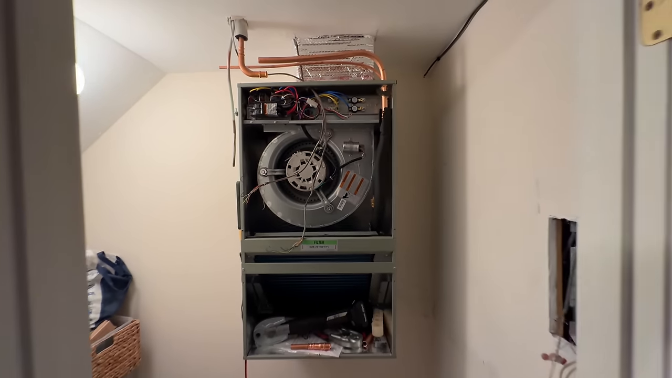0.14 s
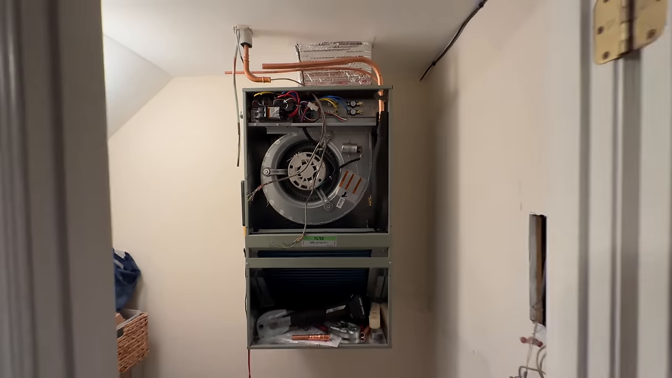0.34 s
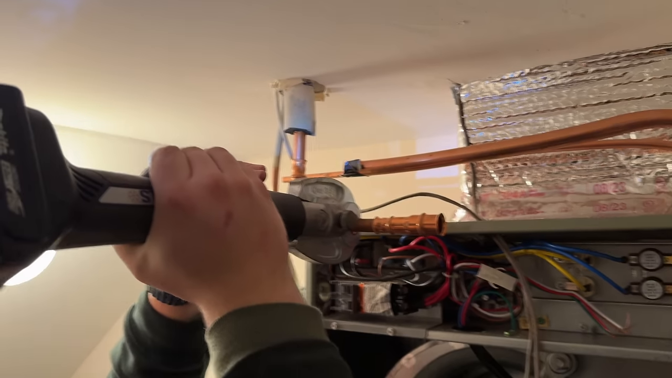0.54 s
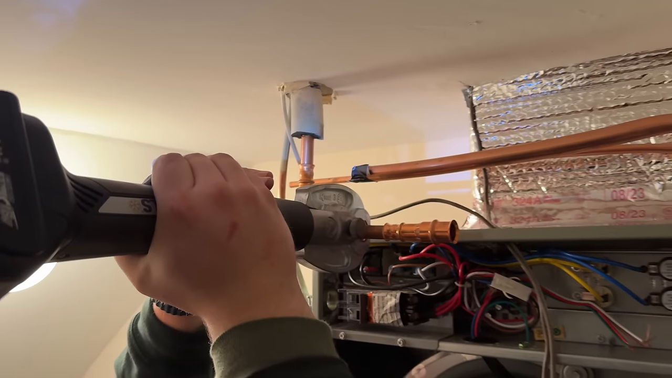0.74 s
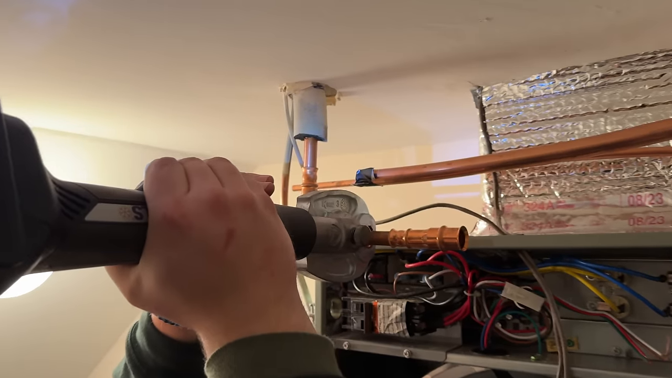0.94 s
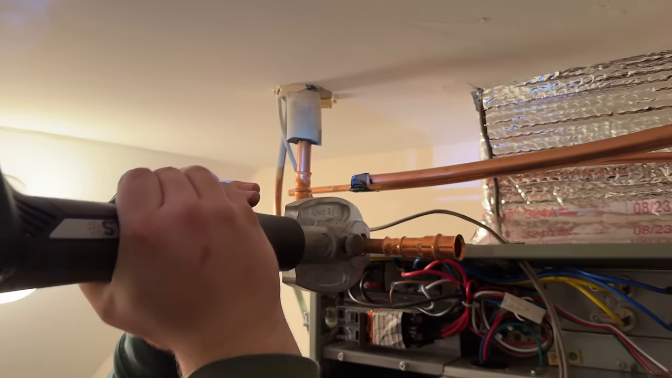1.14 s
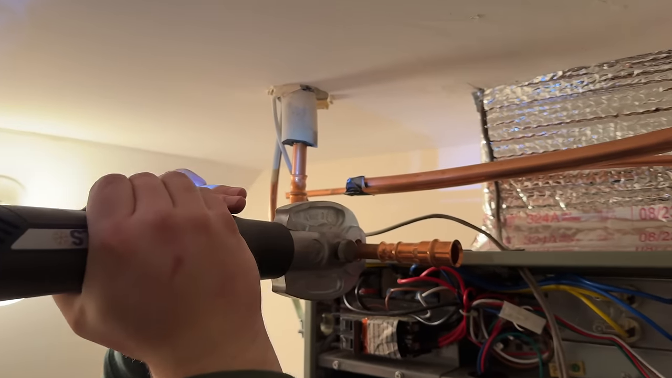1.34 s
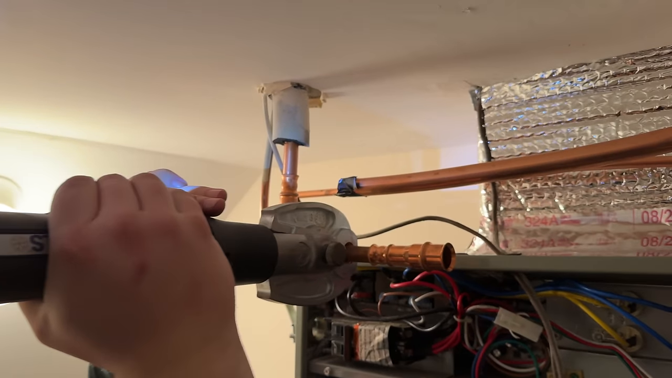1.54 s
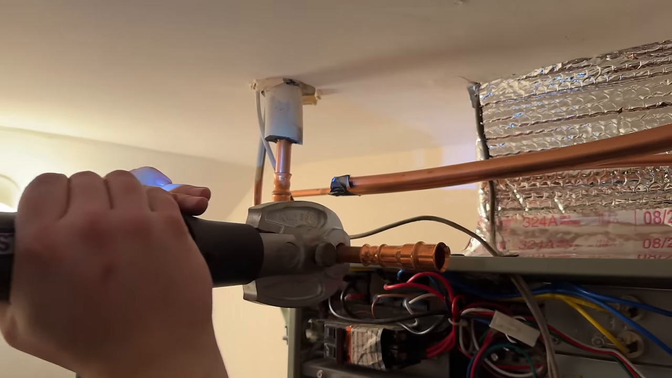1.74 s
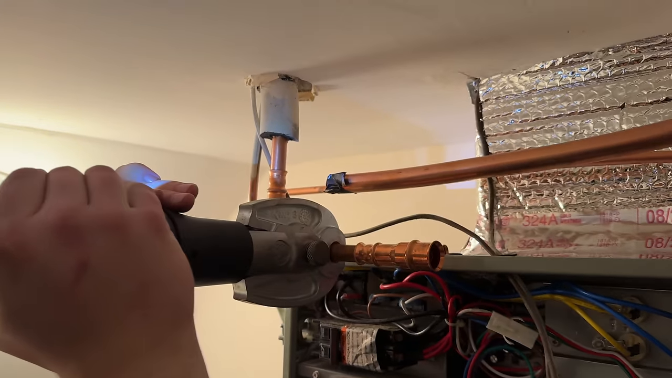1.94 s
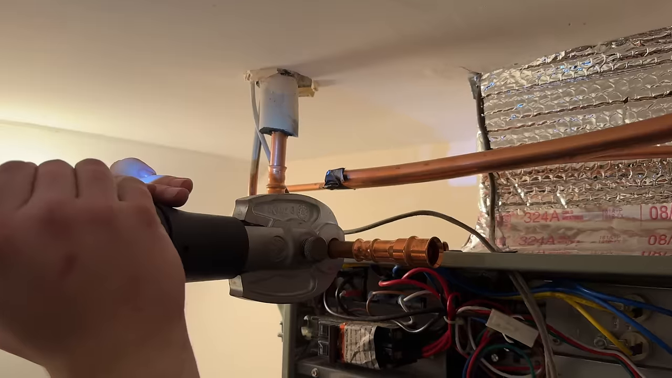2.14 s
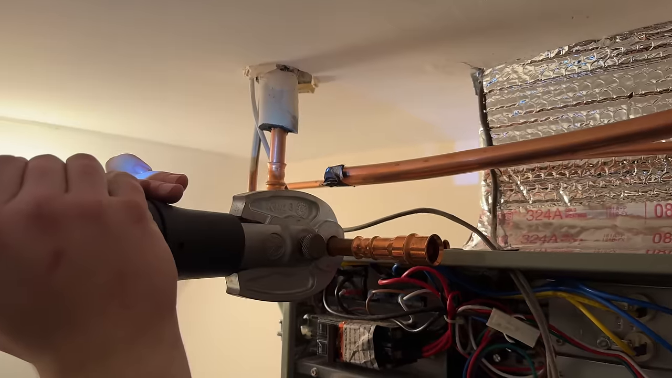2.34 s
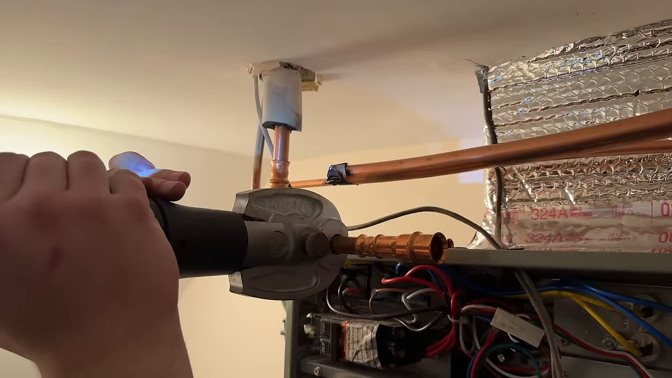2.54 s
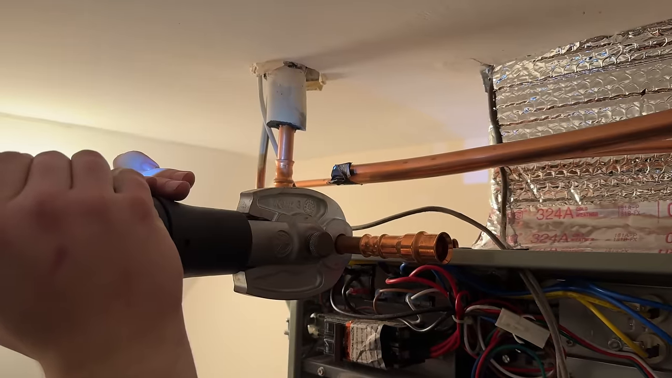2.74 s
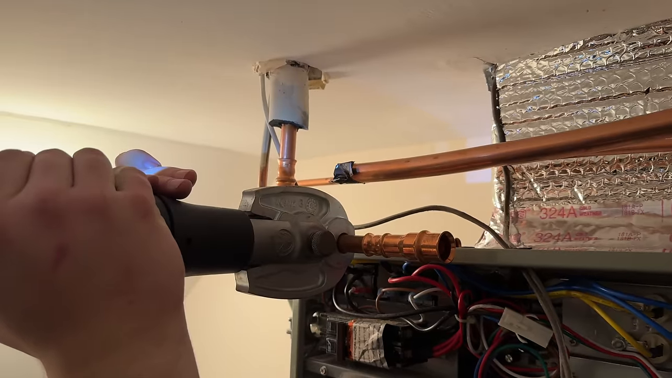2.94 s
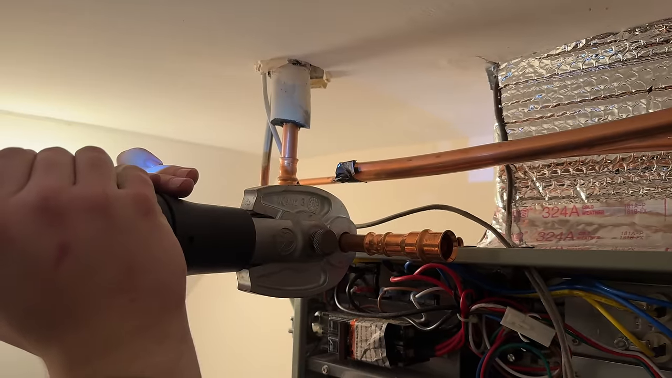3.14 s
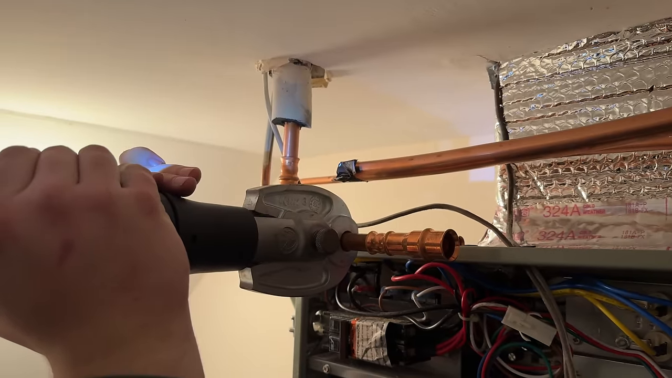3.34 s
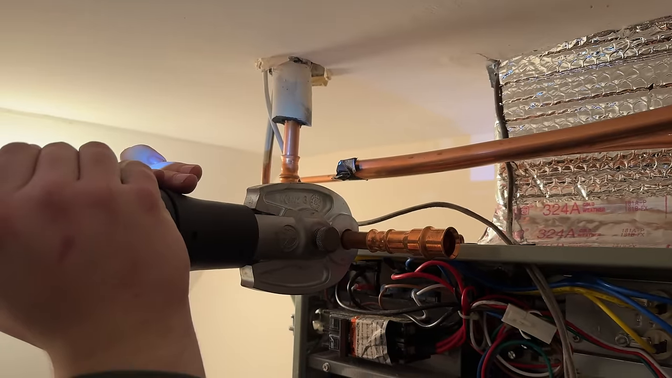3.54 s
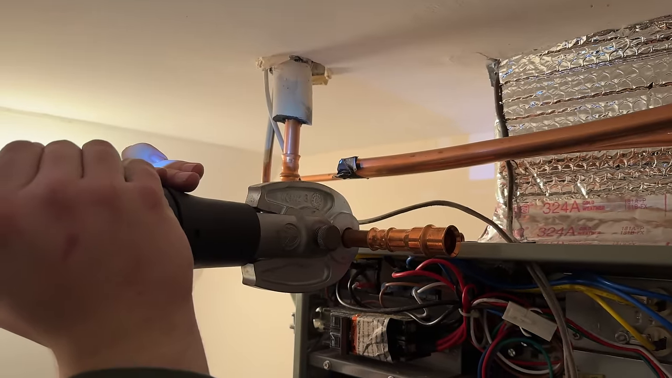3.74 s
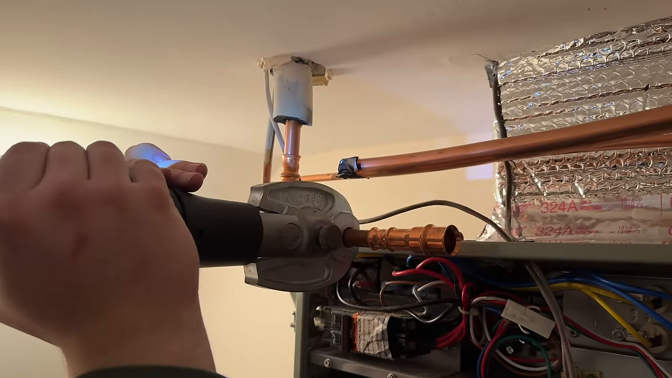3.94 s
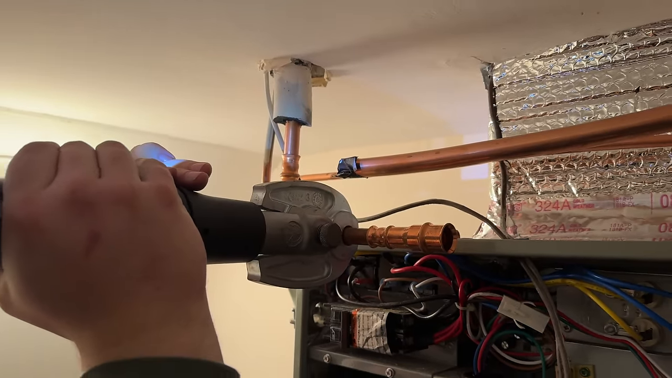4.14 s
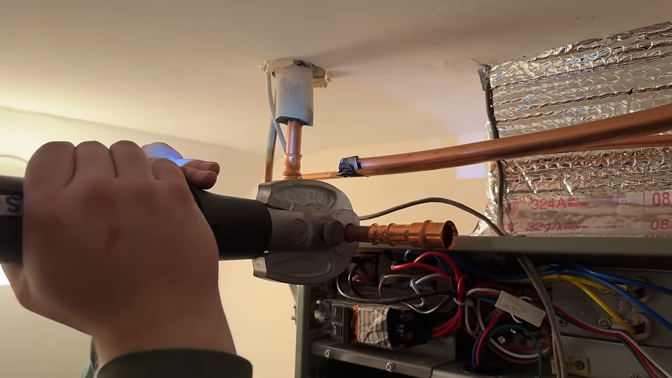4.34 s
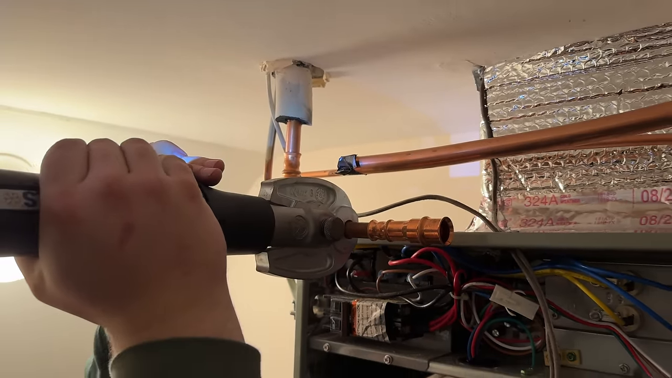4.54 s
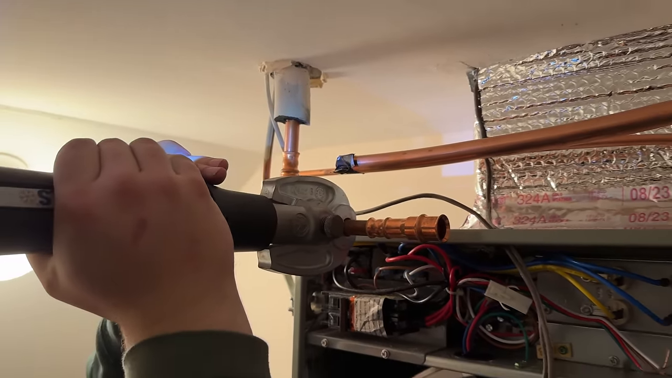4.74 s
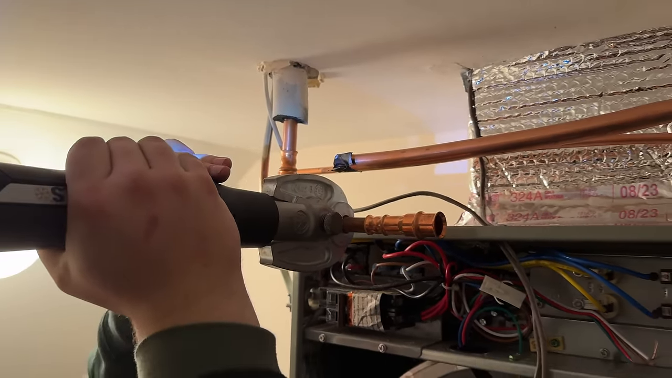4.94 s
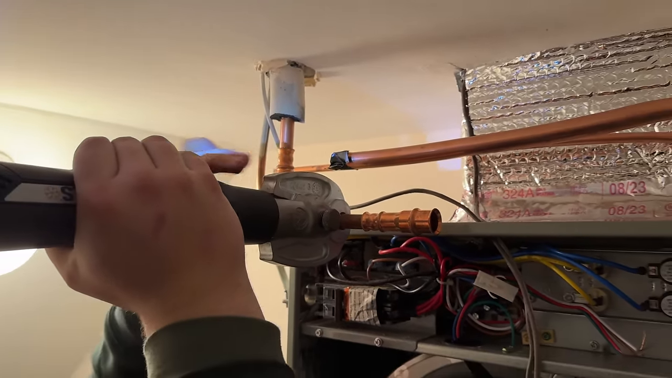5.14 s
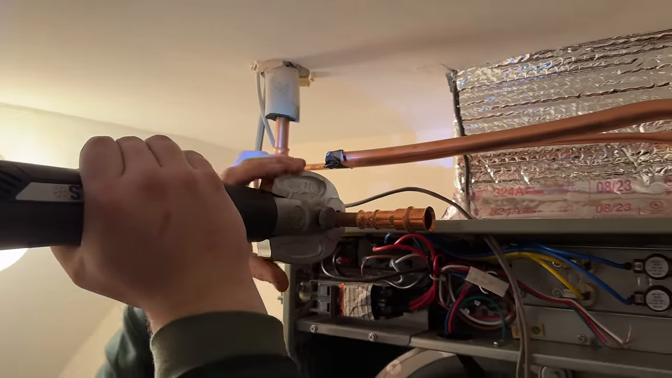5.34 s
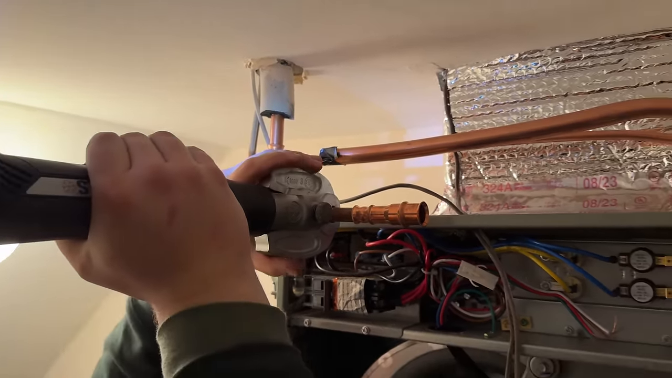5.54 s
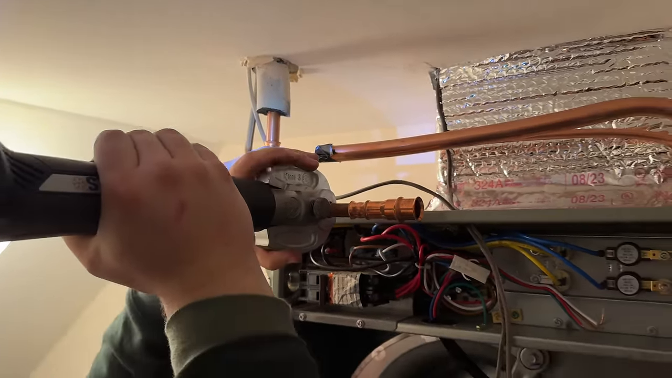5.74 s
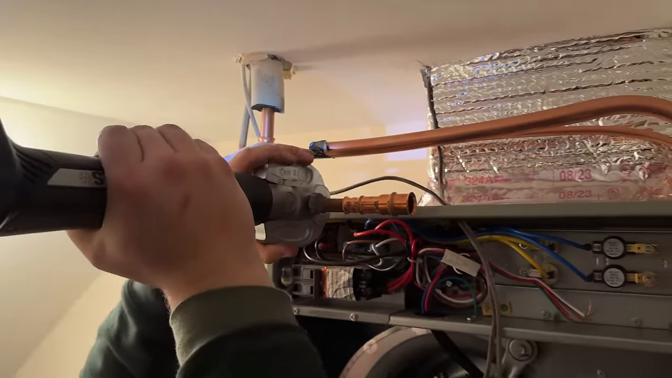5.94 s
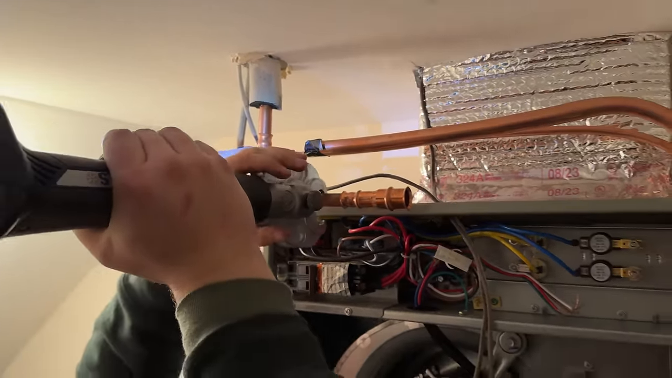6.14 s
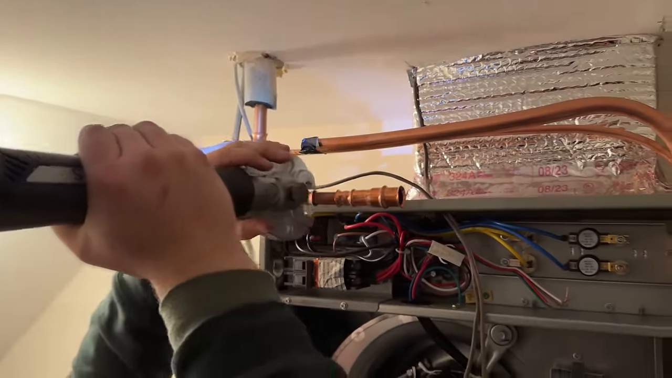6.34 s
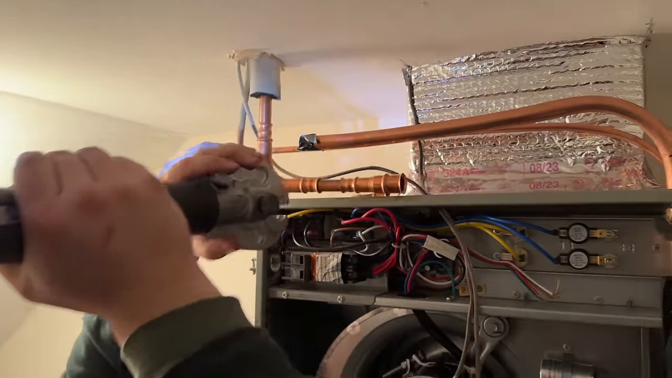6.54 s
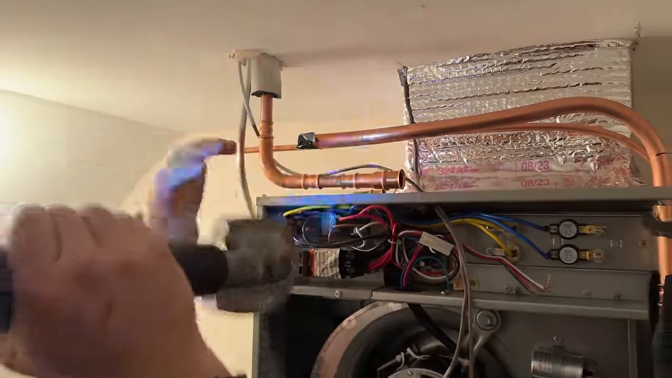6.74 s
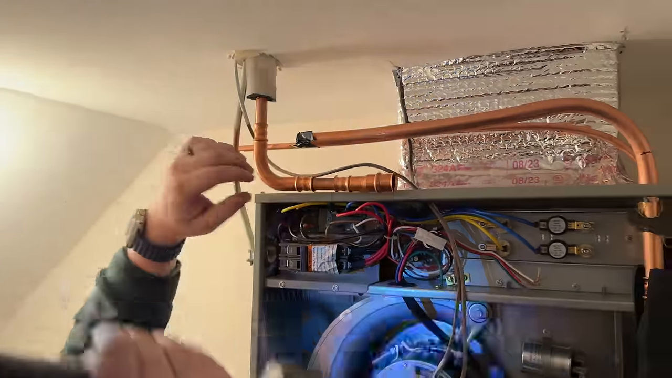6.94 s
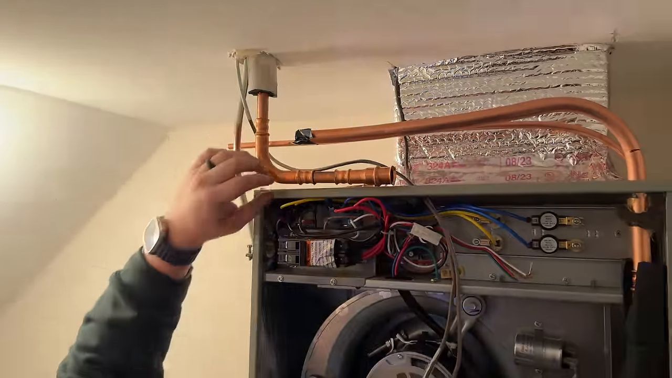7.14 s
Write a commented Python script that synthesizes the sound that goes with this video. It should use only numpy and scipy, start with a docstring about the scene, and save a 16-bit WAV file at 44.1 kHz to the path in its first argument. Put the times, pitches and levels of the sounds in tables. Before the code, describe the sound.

A handheld crimper starts abruptly after light contact clicks, its pump rattling fast with gear whine and a low hum. The tone sags as pressure builds for nearly three seconds, then races for an instant with a valve spit and stops dead. Low room rumble remains, with small clicks and dull taps. Jaws are then worked loose with clacks, cloth rustle and one loud steel snap, heard close in a short-reverb room.

```python
"""A battery press tool crimps a copper fitting in a small utility room: clacks of contact, then the motor starts.
A piston pump strokes twice a turn (shaft harmonics, gear tones, noise bursts) and slows under load; copper rasps.
The relief valve spits (a decaying noise burst) and the motor stops. Hands then shift the tool with soft knocks and
slides of shaped noise, and steel jaws clack open and snap shut as noise bursts through resonances.
Filtered noise gives a low rumble and a faint hiss throughout."""
import sys
import numpy as np
from scipy import signal
from scipy.fft import rfft, irfft, next_fast_len
from scipy.io import wavfile
from scipy.ndimage import uniform_filter1d

SR = 44100
rng = np.random.default_rng(int(sys.argv[2]) if len(sys.argv) > 2 else 0)


def to_wav(s):
    """Save 16-bit WAV."""
    ch = np.atleast_2d(s).T  # columns
    pcm = np.round(np.clip(ch, -1, 1) * 32767)  # PCM
    wavfile.write(sys.argv[1], SR, pcm.astype(np.int16))


N = 317079
TIME = np.arange(N) / SR   # s
SIZE = 2 * next_fast_len(N // 2 + SR // 2)   # transform length, with space for the room's tail
HZ = np.maximum(np.arange(SIZE // 2 + 1) * SR / SIZE, 1)

# shaft speeds at full pressure, squeezing and running free [turns per s]
STAGE_SPEEDS = [44.5, 58.5, 66]
# broad colour of the tool housing: f/Hz, relative level/dB per Hz
HOUSING = [(90, -7), (220, -7.5), (450, -3), (850, 6.5), (1130, -8), (1500, -4), (3100, -5), (4600, -11.5),
           (7000, -16), (11500, -15), (12700, -24), (14000, -14), (15800, -31.5)]
GEARING = 5.63   # motor turns per pump turn
MOTOR_ON, VALVE_OPENS, MOTOR_OFF = .475, 3.27, 3.39   # s
BITE_STARTS, BITE_PEAKS = 0.92, 1.51   # the jaws bite into the copper, s
BLEED_S = .05   # the pressure drains


def from_db(db):
    """Level in decibels to amplitude ratio."""
    return 10 ** (np.asarray(db) / 20)


def rms_one(x):
    """Normalise the effective (rms) amplitude to 1."""
    return x / np.sqrt(np.mean(x ** 2) + 1e-20)


def at_hz(points, hz=HZ):
    """Interpolate a spectrum linearly along a logarithmic frequency axis."""
    f, values = np.array(points)[:, 0], np.array(points)[:, 1]
    return np.interp(np.log(hz), np.log(f), values)


def response(db):
    """Minimum phase: folding the cepstrum makes a causal response with the given gains."""
    cepstrum = irfft(np.log(from_db(db)))
    half = len(cepstrum) // 2
    cepstrum[1:half] *= 2
    cepstrum[half + 1:] = 0
    return np.exp(rfft(cepstrum))


def filtered(x, gain):
    """Linear filtering: multiply the spectrum by a frequency response."""
    return irfft(rfft(x, SIZE) * gain)[..., :N]


def spread(pair, gain, direct=.8, wide_db=0):
    """Stereo coherence: direct sound leads in phase on the left; uncorrelated sound is diffuse."""
    # share of direct sound: f/Hz, factor
    direct_factor = [(2000, 0.95), (4000, 0.88), (8000, 0.96)]
    # stereo width: f/Hz, side minus mid level/dB, before wide_db
    side_level = [(60, -15), (220, -11.5), (330, -2.5), (750, -4.5), (1170, 5.5), (1800, 0), (6400, -3),
                  (9800, 2.5), (14000, -2.5)]
    mid, diffuse = rfft(pair, SIZE) * gain
    direct = np.clip(direct * at_hz(direct_factor), 0, 1)
    side = 1j * direct * mid + np.sqrt(1 - direct ** 2) * diffuse
    side = side * from_db(at_hz(side_level) + wide_db)
    return irfft(np.array([mid + side, mid - side]))[:, :N]


def drift(rate):
    """Random modulation: lines join unit-variance normal values drawn at this rate per second."""
    points = rng.standard_normal(4096)
    return np.interp(TIME * rate, np.arange(len(points)), points)


def levelled(x):
    """Short-term power normalisation over 79 ms, which keeps the single strokes."""
    return x / np.sqrt(uniform_filter1d(x.mean(axis=0) ** 2, size=3500) + 1e-12)


def noise(spectrum):
    """Stationary coloured noise with a mid signal of unit deviation."""
    x = spread(rng.standard_normal((2, N)), from_db(at_hz(spectrum)))
    return x / np.std(x.mean(axis=0))


def resonance(hz, centre_hz, width_hz):
    """Lorentzian resonance: 1 at the centre, 1/2 at the edges of the width."""
    return 1 / (1 + ((hz - centre_hz) / (width_hz / 2)) ** 2)


def peaks(modes, hz=HZ):
    """Modal shapes: one Lorentzian column per resonance."""
    centre, width = np.transpose(modes)[:2]
    return resonance(hz[:, None], centre, width)


def stroke(turn, at, length):
    """Periodic excitation: a Gaussian burst once a turn; place and length are shares of a turn."""
    return np.exp(-(((turn - at + .5) % 1 - .5) / length) ** 2)


def grind(turn, size, wander=0.69):
    """Cyclic contact noise: nearly the same tooth bumps recur each turn while the mesh shifts slowly."""
    rows = rng.standard_normal((4, size))
    surface = np.array([np.interp(turn % 1 * size, np.arange(size), row) for row in rows])
    mesh = wander * drift(3.994)
    return np.cos(mesh) * surface[:2] + np.sin(mesh) * surface[2:]


def thumps(rows, rise_s):
    """Transient envelopes: each soft blow rises linearly and decays exponentially."""
    out, age = np.zeros(N + SR), TIME[:SR]
    for s, db, t60 in rows:
        at = int(s * SR)
        out[at:at + SR] += from_db(db - 60 * age / t60) * np.minimum(age / rise_s, 1)
    return out[:N]


def press_tool(return_at=.57, thud_db=-11, coast_db=-1, valve_db=-21, valve_s=0.033):
    """Source and radiator: a loaded pump shaft drives tones and bursts that the housing colours."""
    # pump shaft slowed by the load, before run-up and racing: t/s, speed/turns per s
    loaded_speed = [(0.55, 63.7), (0.66, 67.2), (1.0, 67.6), (1.29, 65.8), (1.51, 66.2), (1.83, 59.45),
                    (2.35, 57.55), (2.66, 55.9), (2.95, 50.15), (3.28, 46.0)]
    clamp_at, clamp_s, stop_s = 1.55, 0.45, 0.016   # jaws close round the fitting; the shaft stops
    speed = np.interp(TIME, *np.transpose(loaded_speed))
    clamped = np.clip((TIME - clamp_at) / clamp_s, 0, 1)
    hum_db, clatter_db, hiss_db = drive(speed, clamped)
    # the shaft runs up at the start and races briefly once the pressure is released
    run_up = np.clip((TIME - MOTOR_ON) / .045, .1, 1)
    racing = np.interp(TIME, [VALVE_OPENS, 3.33, MOTOR_OFF], [0, 17, 14])
    speed = speed * run_up + racing
    turn = np.cumsum(speed * (1 + .0035 * drift(45))) / SR
    turn = turn - np.interp(2.112, TIME, turn)   # a stroke falls at 2.112 s
    running = np.interp(TIME, [MOTOR_ON - .005, MOTOR_ON + 0.002, MOTOR_OFF, MOTOR_OFF + stop_s], [0, 1, 1, 0])
    # how far the noise repeats from turn to turn
    steady = np.interp(TIME, [MOTOR_ON, .58, VALVE_OPENS, 3.31], [0.37, 0.91, 0.97, 0.66])
    below_mid = 1 / (1 + (HZ / 1050) ** 10)
    below_top = 1 / (1 + (HZ / 3200) ** 10)

    # under load the pressure stroke outgrows the return stroke
    middle = clatter(turn, steady, return_at, back=.95 - 0.18 * clamped, whirr=.42, fresh=0.38, length=.125)
    thuds = clatter(turn, steady, return_at, back=0.93, whirr=0.31, fresh=1.1, length=0.14)
    ticks = clatter(turn + .02, steady, return_at, back=0.49, whirr=.45 - 0.09 * clamped, fresh=0.57, length=.14)
    rasp = clatter(turn, steady, return_at, back=0.9, whirr=0.28, fresh=0.63, length=0.11)

    out = from_db(hum_db) * hum(turn, speed, steady, return_at) + boom()
    pressed = clamped * np.clip(1 - (TIME - VALVE_OPENS) / BLEED_S, 0, 1)
    tones = steady ** 2 * whine(turn, speed, clamped, return_at) + pressed * oil(turn, speed)
    out += spread(tones, 1)
    thud_gain = from_db(hum_db) * (from_db(thud_db) + from_db(coast_db) * (1 - steady))
    out += thud_gain * levelled(spread(thuds, from_db(at_hz(HOUSING)) * below_mid))
    out += from_db(clatter_db) * housing_ring(middle, clamped, (1 - below_mid) * below_top)
    out += from_db(hiss_db) * housing_ring(ticks, clamped, 1 - below_top)
    out += bite(rasp)

    since = np.maximum(TIME - VALVE_OPENS, 0)
    spit = (1 - np.exp(-since / 0.00087)) * np.exp(-since / valve_s)
    jet = noise([(3500, -19.5), (8000, 6.0), (11000, 9.0), (13000, -2.0), (15500, -20.5)])
    return out * running + from_db(valve_db) * spit * jet


def drive(speed, clamped):
    """Load dependence in dB: load muffles the hum and sharpens the rest, until pressure is released."""
    slack_db, engages_s, attack_s = -14.5, 0.4905, 0.019   # reduced level until the pump takes hold
    full, _, free = STAGE_SPEEDS
    load = np.clip((free - speed) / (free - full), 0, 1)
    released = np.clip((TIME - VALVE_OPENS) / BLEED_S, 0, 1)
    attack_db = slack_db * np.exp(-np.maximum(TIME - engages_s, 0) / attack_s)
    hum_db = attack_db - 25 - 6 * load
    clatter_db = attack_db - 31 + 3 * clamped - 3 * released
    hiss_db = attack_db - 29 + 2 * load - 6.5 * released
    return hum_db, clatter_db, hiss_db


def hum(turn, speed, steady, return_at, waver=0.062, motor_db=-19, width=0.25, scatter=.6):
    """Fourier series of the two pump strokes; its balance shifts as the load slows the shaft."""
    # relative level/dB of shaft harmonics 1, 2, 3 .. at full pressure, squeezing, running free
    full_level = [-1.5, 1, -8, -4.5, -1.5, 1.5, -18.5, -13, -17, -21.5, -15, -11.5, -2, -2, 2, 0.5, -4,
                  -4.5, -3.5]
    squeeze_level = [-12.5, -18.5, -5, -4, -10.5, -14.5, -12, -9, -9, -7.5, -9, -4, -13, -3, -5.5, -11]
    free_level = [-3, -8, 1.5, -2, -15, -7, -2.5, -11.5, -2.5, -4.5, 1, -6, -7.5, -8, -8]
    out = np.zeros((2, N))
    stages = [from_db(table) for table in (full_level, squeeze_level, free_level)]
    stages = [np.pad(s / np.linalg.norm(s), (0, len(full_level) - len(s))) for s in stages]
    wobble, flutter = waver * drift(30), 1 + waver * drift(25)
    for k, gains in enumerate(np.transpose(stages), start=1):
        # the two strokes set the phase of each harmonic, and the housing scatters it
        two_strokes = 1 + 0.69 * np.exp(-2j * np.pi * k * return_at)
        lag = np.angle(two_strokes) + np.pi / 2 + scatter * rng.normal()
        angle = 2 * np.pi * k * turn + lag + wobble
        gain = np.interp(speed, STAGE_SPEEDS, gains) * body_gain(k * speed)
        side = width * np.sqrt(k / 5) * np.sin(angle) * np.array([[-1], [1]])
        out += gain * (np.cos(angle) + side)
    motor = from_db(motor_db) * np.cos(2 * np.pi * GEARING * turn)
    return np.sqrt(2) * steady * flutter * (out + motor)


def body_gain(hz):
    """Resonant amplification: the tool's body lifts a gliding tone near each mode."""
    # body resonances: f/Hz, width/Hz, lift/dB
    body_modes = [(245.4, 19, 6), (809.5, 49, 5.5), (1402, 120, 6), (2316, 230, 9)]
    return from_db(sum(db * resonance(hz, centre, width) for centre, width, db in body_modes))


def boom(start_db=-28, stop_db=-32, case_hz=240, width_hz=60, swell_s=0.031):
    """Cavity band: the hollow case booms as the motor kicks in and as it races without load."""
    swells = 0
    for s, db in ((.555, start_db), (3.36, stop_db)):
        swells = swells + from_db(db) * np.exp(-((TIME - s) / swell_s) ** 2)
    case = 1 / (1 + ((HZ - case_hz) / width_hz) ** 4)
    return swells * levelled(spread(rng.standard_normal((2, N)), case))


def whine(turn, speed, clamped, return_at, back=.7, between=.45, length=0.17):
    """Amplitude modulation: gear tones glide with the shaft, throb with strokes and swell at body modes."""
    # gear tones: multiple of shaft speed, level/dB running free, biting, jaws clamped (before body lift)
    gear_tones = [(20, -39.5, -48.5, -52), (23.1, -40.5, -38.5, -51), (25, -48, -45, -42.5),
                  (30, -52.5, -35, -39.5), (35.13, -59.5, -46, -51), (38, -40.5, -44, -44),
                  (41, -46, -41, -41.5), (44, -55, -47, -41), (46.6, -58.5, -54.5, -45.5),
                  (50.5, -59, -57.5, -52)]
    stage = np.clip((TIME - BITE_STARTS) / 0.39, 0, 1) + clamped   # 0 free, 1 biting, 2 clamped
    tones = 0
    for k, *stage_db in gear_tones:
        gain = from_db(np.interp(stage, np.arange(len(stage_db)), stage_db)) * body_gain(k * speed)
        tones = tones + gain * np.cos(2 * np.pi * (k * turn + rng.random((2, 1))))
    throb = between + stroke(turn, 0, length) + back * stroke(turn, return_at, length)
    return np.sqrt(2) * tones * rms_one(throb)


def oil(turn, speed, between=.25, length=.13):
    """Modulated narrow-band noise: strokes squirt oil with a hiss that rises as load slows the shaft."""
    # oil hiss bands: f/Hz while squeezing, f/Hz at full pressure, width/Hz, level/dB
    oil_bands = [(5550, 5850, 270, -39.5), (10250, 12000, 400, -37)]
    full, squeezing, _ = STAGE_SPEEDS
    pressure, out = (squeezing - speed) / (squeezing - full), 0
    for low_hz, high_hz, width_hz, db in oil_bands:
        low_pass = signal.butter(2, width_hz / 2, fs=SR, output="sos")
        flutter = signal.sosfilt(low_pass, rng.standard_normal((2, N)))
        centre_hz = low_hz + (high_hz - low_hz) * pressure
        carrier = np.cos(2 * np.pi * np.cumsum(centre_hz) / SR)
        out = out + from_db(db) * rms_one(flutter * carrier)
    return out * rms_one(between + stroke(turn, 0, length))


def clatter(turn, steady, return_at, back, whirr, fresh, length, gears=.08, teeth=0.33):
    """Impulsive excitation: strokes rattle the drive and press gear teeth; gears whirr between strokes."""
    blows = stroke(turn, 0, length) + back * stroke(turn, return_at, length)
    repeating = grind(turn, size=900)
    loose = rng.standard_normal((2, N))
    motor_teeth = grind(GEARING * turn, size=160)
    texture = steady * (repeating + teeth * motor_teeth) + (fresh + 1 - steady) * loose
    return (blows + whirr) * texture + gears * motor_teeth


def housing_ring(source, clamped, band):
    """Modal filtering: housing resonances within a band change as the jaws clamp the pipe."""
    # housing resonances: f/Hz, width/Hz, lift/dB running free, lift/dB with the jaws clamped
    housing_modes = [(800, 310, 5.5, 5.5), (1434, 99, 7.5, 4.5), (2110, 190, -2, 0), (2324, 290, 4, 8.5),
                     (2684, 280, 5, 0.5), (3482, 92, -4, 2), (8240, 1100, 7.5, 6)]
    free_db, clamped_db = (peaks(housing_modes) @ np.array(housing_modes)[:, 2:]).T
    loose = spread(source * np.sqrt(1 - clamped), band * from_db(at_hz(HOUSING) + free_db))
    tight = spread(source * np.sqrt(clamped), band * from_db(at_hz(HOUSING) + clamped_db))
    return levelled(loose + tight)


def bite(strokes, level_db=-24.0, fade_s=.09):
    """Plastic yielding: copper rasps with each stroke, growing as the jaws dig in, then dying away."""
    # copper giving way: f/Hz, relative level/dB per Hz
    rasp_colour = [(1000, -30.5), (1500, -7.5), (2100, 2), (2900, 0), (3500, -15.5), (5500, -20),
                   (8500, -11), (11000, -29)]
    growth = np.clip((TIME - BITE_STARTS) / (BITE_PEAKS - BITE_STARTS), 0, 1)
    swell = growth * np.exp(-np.maximum(TIME - BITE_PEAKS, 0) / fade_s)
    return from_db(level_db) * swell * levelled(spread(strokes, from_db(at_hz(rasp_colour))))


def jaws(level_db=1, edge_db=-13, edge_share=0.62, favour_db=6, favour_width_hz=450, scatter_db=2,
         snap_t60=0.014, ring_db=-11, ring_t60=0.044, rattle_db=-27, rattle_t60=0.181,
         chime_db=-41, chime_t60=0.15):
    """Impact excitation of modes: steel snaps and rings, with a faint grainy rattle of the links."""
    # trigger, jaws and fitting touching: t/s, relative peak level/dB, brightness/dB, favoured ring f/Hz
    contacts = [(0.168, -43, 10, 5700), (0.455, -43, 4.5, 4500), (0.4715, -28, 12, 4270),
                (0.4992, -17.5, 1, 2760), (3.7099, -45, -1, 3340), (3.8119, -33, 13.5, 7500),
                (3.902, -35.5, 1.5, 2130), (4.8578, -51.5, 1.5, 850), (5.7167, -51, -8.5, 1505),
                (5.979, -22, 1.5, 1450), (5.9931, -23, -4.5, 2750), (6.0112, -20.5, -3.5, 900),
                (6.0205, -13, 3, 2620), (6.034, -27.5, -1, 1987), (6.081, -38, -2.5, 900),
                (6.191, -41, 6, 4300), (6.2736, -38.5, -6, 2820), (6.3861, -36.5, -4, 1000),
                (6.4552, -36.5, 8.5, 2860), (6.5441, -28.5, -4, 910), (6.5555, -28.5, -10, 2820),
                (6.6186, -6.5, 11, 1854), (6.6685, -28, 0.5, 2130)]
    # broad colour of the steel: f/Hz, relative level/dB per Hz
    steel_colour = [(150, -13.5), (600, -3.5), (1150, -11), (1900, -5.5), (3000, -10.5), (5500, -7),
                    (8000, -5), (14000, -6), (16000, -19.5)]
    # jaw resonances: f/Hz, width/Hz, lift/dB while on the pipe, lift/dB once off it
    jaw_modes = [(860, 130, 10, 7.5), (1470, 150, 5.5, -5), (2030, 370, 1, 6.5), (2650, 150, 6.5, -2),
                 (3750, 150, 0.5, 10), (5580, 260, 3.5, 7)]
    jaws_off_at = 6.6   # s
    size = 8192
    age, hz = TIME[:size], np.maximum(np.arange(size // 2 + 1) * SR / size, 1)
    strike = from_db(-60 * age / snap_t60) + from_db(ring_db - 60 * age / ring_t60)
    strike = strike * (1 - np.exp(-age / 0.0017))
    rings, (on_pipe_db, off_pipe_db) = peaks(jaw_modes, hz), np.array(jaw_modes)[:, 2:].T
    cracks = np.zeros((2, N + size))
    for s, peak_db, bright_db, ring_hz in contacts:
        ring_dbs = off_pipe_db if s > jaws_off_at else on_pipe_db
        ring_dbs = ring_dbs + scatter_db * rng.standard_normal(len(jaw_modes))
        tilt = [(600, -bright_db), (3500, 0), (7000, edge_db + edge_share * bright_db)]
        colour = at_hz(steel_colour, hz) + rings @ ring_dbs + at_hz(tilt, hz)
        # the place of contact favours one ring
        colour = colour + favour_db * peaks([(ring_hz, favour_width_hz)], hz)[:, 0]
        links = np.repeat(rng.exponential(size=64), size // 64)
        decay = strike + links * from_db(rattle_db - 60 * age / rattle_t60)
        crack = irfft(rfft(rng.standard_normal((2, size)) * decay) * response(colour))
        tones = [(ring_hz, ring_dbs.max())] + [(mode[0], db) for mode, db in zip(jaw_modes, ring_dbs)]
        chime = 0
        for f, db in tones:
            fading = from_db(chime_db + db - 60 * age / chime_t60)
            chime = chime + fading * np.sin(2 * np.pi * (f * age + rng.random((2, 1))))
        at = int(s * SR)
        cracks[:, at:at + size] += from_db(peak_db + level_db) * (crack / np.abs(crack).max() + chime)
    return spread(cracks[:, :N], 0.76, direct=.93, wide_db=-0.5)


def bumps(level_db=-6, knock_db=-7, tap_db=-7, knock_t60=0.24, tap_t60=0.14):
    """Damped forced response: soft blows shake the cabinet or the tool's case for a moment."""
    # tool and pipe against the cabinet: t/s, relative level/dB, decay time t60/s
    cabinet_blows = [(1.309, -19, .16), (1.349, -21, 0.13), (2.558, -20.5, .16), (5.722, -38.5, 0.15),
                     (6.033, -24.5, .18), (6.056, -25.5, 0.24), (6.102, -33, 0.16), (6.581, -22, 0.16)]
    # dull cabinet colour: f/Hz, relative level/dB per Hz
    cabinet_colour = [(50, -17), (100, 9), (170, 1.5), (300, -13.5), (500, -15.5), (1000, -42.5)]
    # grip on the plastic case: t/s, relative level/dB of the hollow thud, relative level/dB of the tap
    grip_knocks = [(4.236, -43, -53), (4.401, -45.5, -57), (4.63, -52, -80), (4.945, -54.5, -69)]
    # hollow thud: f/Hz, relative level/dB per Hz
    thud_colour = [(150, -7), (380, 3), (700, -18), (3000, -57)]
    # tap on the case: f/Hz, relative level/dB per Hz
    tap_colour = [(500, -9), (2100, 4), (8000, -27)]
    cabinet = from_db(level_db) * thumps(cabinet_blows, rise_s=0.0097) * noise(cabinet_colour)
    thud_rows = [(s, db, knock_t60) for s, db, _ in grip_knocks]
    tap_rows = [(s, db, tap_t60) for s, _, db in grip_knocks]
    thuds = from_db(knock_db) * thumps(thud_rows, rise_s=0.0037) * noise(thud_colour)
    taps = from_db(tap_db) * thumps(tap_rows, rise_s=0.0029) * noise(tap_colour)
    return cabinet + thuds + taps


def handling(grain_db=3):
    """Friction noise: skin and cloth slide unevenly over the tool, each move swelling and fading."""
    # hands and sleeves on the tool: t/s, swell time/s, rub level/dB, swish level/dB
    slide_moves = [(-0.1, 0.086, -50.5, -64), (0.232, 0.037, -56.5, -63.5), (5.26, 0.019, -86, -64.5),
                   (5.68, 0.023, -62, -67), (6.05, 0.04, -63, -65), (6.303, 0.025, -50, -71),
                   (6.422, 0.029, -57, -58.5), (6.72, 0.12, -73.5, -77)]
    # skin rubbing: f/Hz, relative level/dB per Hz
    rub_colour = [(250, 0.5), (600, -4), (1000, -3), (2400, -8.5), (6000, -25)]
    # cloth swishing: f/Hz, relative level/dB per Hz
    swish_colour = [(1800, -18.5), (3200, -2.5), (11000, -3.5), (16000, -14.5)]
    rub, swish = np.zeros((2, N))
    for s, swell, rub_db, swish_db in slide_moves:
        age = np.clip((TIME - s) / swell, 0, 20)
        move = age * np.exp(1 - age)
        rub += from_db(rub_db) * move
        swish += from_db(swish_db) * move
    return from_db(grain_db * drift(140)) * (rub * noise(rub_colour) + swish * noise(swish_colour))


def room(x, wet_db=-16):
    """Reverberation: convolution with a dense noise tail whose decay time varies with frequency."""
    # decay time of the room: f/Hz, t60/s
    room_decay = [(100, 0.25), (500, 0.23), (2500, 0.28), (7000, 0.037), (15000, 0.11)]
    age, tail = TIME[:SR // 2], 0
    edges = np.geomspace(60, 16000, 9)
    for low, high in zip(edges, edges[1:]):
        band_pass = signal.butter(2, [low, high], "band", fs=SR, output="sos")
        band = signal.sosfilt(band_pass, rng.standard_normal((2, len(age))))
        tail = tail + band * from_db(-60 * age / at_hz(room_decay, np.sqrt(low * high)))
    tail = rms_one(tail * (age > .004)) / np.sqrt(len(age))   # silent for the first 4 ms
    return x + from_db(wet_db) * filtered(x, rfft(tail, SIZE))


def background(rumble_db=-51, air_db=-81.0):
    """Ambient noise: a low rumble with random level lumps, and a faint steady hiss."""
    # low room rumble: f/Hz, relative level/dB per Hz
    rumble_colour = [(20, -26), (42, -7.5), (62, 6), (115, -2), (160, -2), (210, -12), (420, -26.5),
                     (600, -40.5), (1000, -63)]
    # faint hiss of the room: f/Hz, relative level/dB per Hz
    air_colour = [(400, -4), (2300, -10.5), (15000, -26.5)]
    lumps_db = 2 * drift(23)
    rumble = from_db(rumble_db + lumps_db) * noise(rumble_colour)
    return rumble * from_db([[-1.4], [1.3]]) + from_db(air_db) * noise(air_colour)


def scene():
    """Superposition: the tool in its reverberant room, dry handling and the background add linearly."""
    near = press_tool() + jaws() + bumps()
    return (room(near) + handling()) * from_db([[-.4], [.4]]) + background()


def record(dry):
    """Band limiting: a steep low-pass cuts the top above 15.9 kHz."""
    return filtered(dry, 1 / (1 + (HZ / 15900) ** 120))


dry = scene()
out = record(dry)
to_wav(out)
```